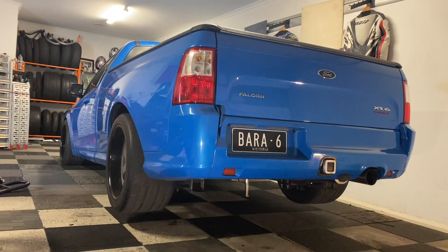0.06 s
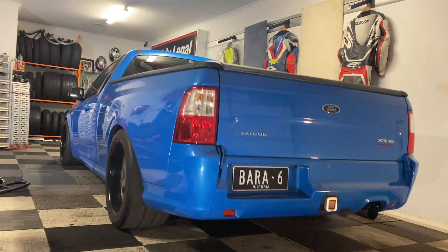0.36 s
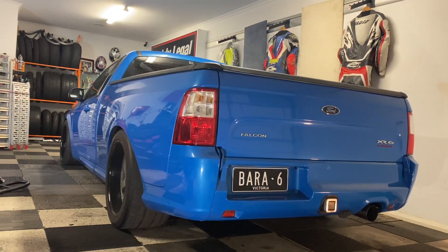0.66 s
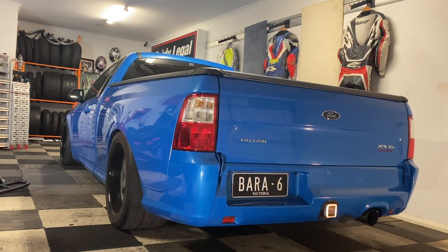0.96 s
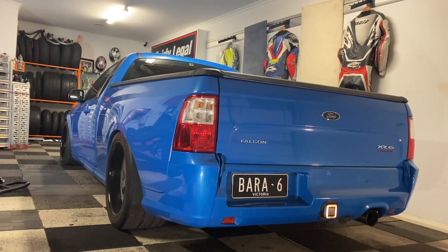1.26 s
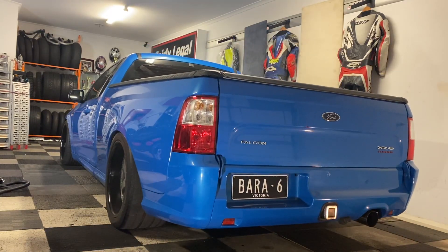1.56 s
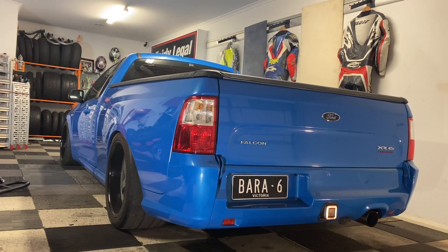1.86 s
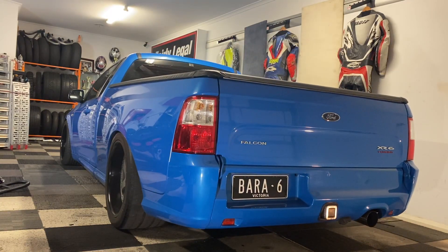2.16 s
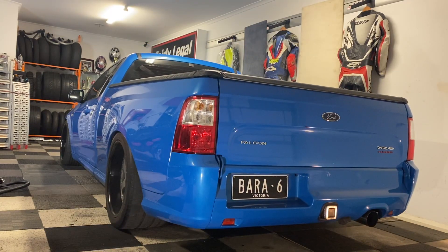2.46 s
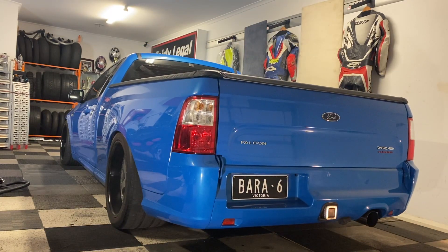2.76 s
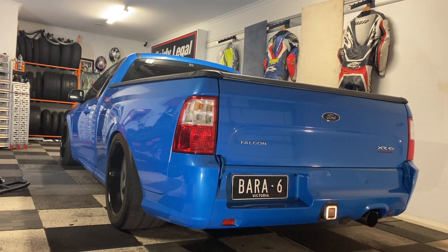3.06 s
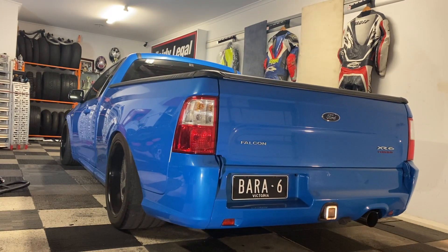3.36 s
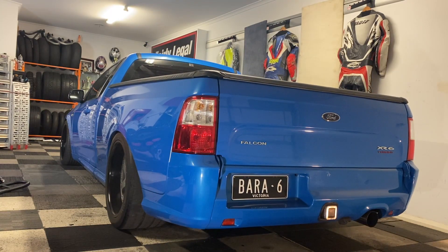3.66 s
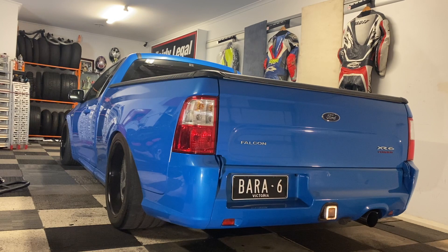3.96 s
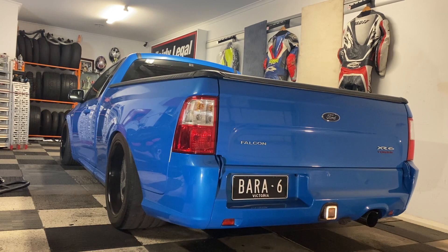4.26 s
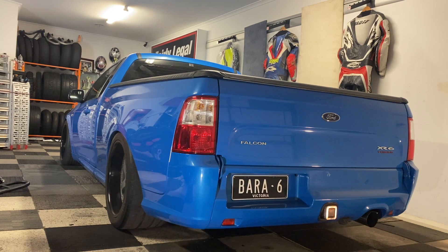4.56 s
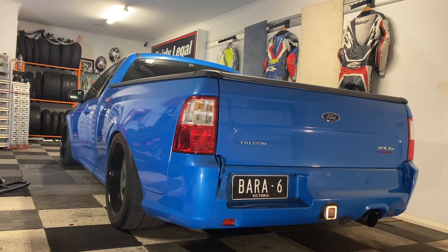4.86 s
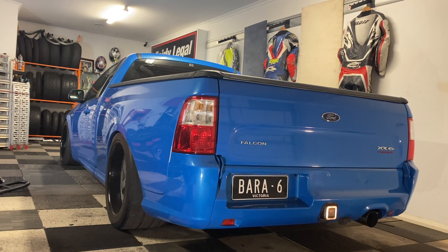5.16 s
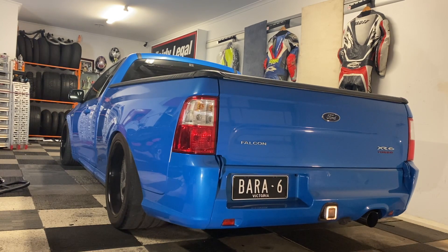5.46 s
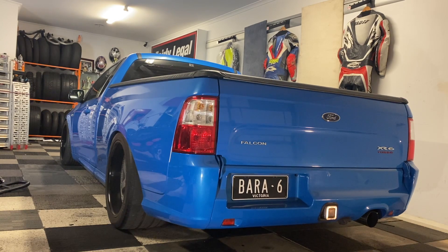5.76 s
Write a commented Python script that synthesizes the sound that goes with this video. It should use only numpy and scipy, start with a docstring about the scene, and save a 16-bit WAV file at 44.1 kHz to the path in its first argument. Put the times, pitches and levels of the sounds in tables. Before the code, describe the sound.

A loud rush of air and heavy thuds as a car comes off its air jacks, then a few separate clunks and a metallic snap.

```python
"""A hard-walled garage, behind the tailgate of a utility car coming down off its air jacks. A turbulent jet
roars from the valve, the tyres land in turn, panels boom and the body shudders. The last air sighs, seeps and
sings faintly, something clacks, and two jack rams knock home. Later come two heavy clunks, soft scuffs and the
snap of a metal coupling. Each blow is a burst of contact noise and each flow a sustained noise, filtered by the
resonances of its source and the reverberation of the room."""
import sys
import numpy as np
from scipy import signal
from scipy.fft import rfft, irfft, next_fast_len
from scipy.io import wavfile
from scipy.ndimage import uniform_filter1d

SR = 44100
rng = np.random.default_rng(int(sys.argv[2]) if len(sys.argv) > 2 else 0)


def put_to_file(sound):
    """Save the sound as 16-bit audio at rate SR, in the file named by the first command-line argument."""
    columns = np.atleast_2d(sound).T  # one column per channel
    safe = np.clip(columns, -1, 1)
    whole_steps = np.round(safe * 32767)
    wavfile.write(sys.argv[1], SR, whole_steps.astype(np.int16))


N = 256220
TIME = np.arange(N) / SR

# Transient excitations: (time [s], energy [dB], chatter time constant [s], tilt [dB/octave])
TYRE_BLOWS = [(.290, 6, 0.0012, 3), (.300, 9, 0.0028, 1.5), (.349, 9, 0.0054, 3), (.388, 7, 0.005, -6.5),
              (.476, 9.5, 0.0046, 0.2), (.499, 7.5, 0.0033, 0.5), (.612, -1, 0.0051, 0.5),
              (.682, -1.5, 0.0029, -5)]
SPIT_AND_CLACK = [(.338, -5.5, .005, 3), (1.458, -9.5, 0.0085, -0.3)]
RAM_BLOWS = [(1.936, 0.5, 0.005, 4.5), (1.943, 8.5, 0.0053, 3), (2.495, -8, 0.0028, 0),
             (2.505, -1, 0.0036, -4)]
PING_BLOWS = [(1.938, -18.5, 0.009, 0), (2.364, -24.5, 0.0076, -4)]
CLUNK_BLOWS = [(4.235, -10.5, 0.0064, 6.5), (4.249, 3.5, 0.0035, 1.74), (4.294, -3, 0.0075, -8),
               (4.466, -11, 0.0067, -15), (4.585, -23.5, 0.0041, -7)]
THUMP_BLOWS = [(4.805, -21.5, 0.0095, -1.5), (4.911, 0, 0.005, 2.5), (4.920, -2, 0.003, 2.5),
               (4.967, -4.5, 0.0016, -1.5), (5.170, -11.5, 0.0026, -0.2)]
SCUFF_RUBS = [(5.335, -22.5, 0.021, -8), (5.595, -25, 0.014, -7)]
CRACK_BLOWS = [(5.648, -7, 0.00015, -7)]
RATTLE_BLOWS = [(5.648, -4.5, 0.00084, 2), (5.653, -8.5, 0.0048, -5.5)]
# Spectral envelopes of the sources: (frequency [Hz], relative power density [dB])
AMBIENT_SPECTRUM = [(22, -27), (36, -13), (48, 0), (95, -1), (140, -9), (230, -17), (420, -24), (700, -36),
                    (1400, -43), (2100, -43), (2300, -34), (2480, -33.5), (2750, -45), (4500, -51),
                    (16000, -61)]
JET_SPECTRUM = [(30, -24), (55, -4), (110, 0), (350, -2), (700, -2.5), (1250, -9.5), (1550, -14),
                (2300, -14.5), (3300, -9.5), (5500, -14.5), (8000, -18.5), (11000, -23), (15500, -27)]
TYRE_SPECTRUM = [(25, -24), (38, -11), (50, 3), (80, 3), (140, -5.5), (240, -5.5), (550, -11.5), (750, -16),
                 (1250, -22), (2000, -34), (5000, -40), (16000, -72.5)]
SPIT_SPECTRUM = [(50, -7), (200, 4.5), (500, 4.5), (1000, -7), (1900, -5), (2400, -11), (3000, -4.5),
                 (3700, -16.5), (5000, -18), (8000, -7.5), (11000, -13), (16000, -17)]
LINE_SPECTRUM = [(35, -15), (60, 3.5), (95, 9.5), (150, 0.5), (280, 1), (450, -5), (650, -9.5), (900, -17),
                 (1300, -18), (2200, -23.5), (3200, -25), (5500, -37), (10000, -40.5), (16000, -58)]
RAM_SPECTRUM = [(35, -62.5), (70, -7.5), (100, 0), (190, 5), (320, 4.5), (430, 5), (750, -9), (1050, -22.5),
                (1900, -34.5), (3000, -59), (6000, -82), (16000, -81)]
PING_SPECTRUM = [(100, -15), (500, -6), (1900, -9), (2400, -9.5), (3000, -7.5), (3700, -12), (5000, -12),
                 (8000, -14.5), (11000, -17.5), (16000, -22)]
CLUNK_SPECTRUM = [(25, -14.5), (45, 5.5), (75, 6.5), (130, 1), (310, -2.5), (550, -7), (1000, -14.5),
                  (1600, -21), (2600, -34), (4500, -46), (7500, -46), (11000, -58.5), (16000, -68)]
THUMP_SPECTRUM = [(25, -9), (42, 9), (70, 13.5), (130, -4), (260, -3), (380, -5), (560, -10), (900, -18),
                  (1400, -26), (2500, -30), (3700, -41), (5500, -52.5), (16000, -73)]
COUPLING_SPECTRUM = [(40, -22), (100, -11), (250, -5), (550, 5), (1000, 1), (2300, -7), (3500, -14.5),
                     (5500, -19.5), (8000, -9.5), (11000, -11.5), (15000, -15.5)]
CRACK_SPECTRUM = [(100, -44), (1500, -11), (4000, -16), (5500, -2), (8000, -2), (11000, 9), (15000, -2)]
# Resonances whose power adds to an envelope: (frequency [Hz], bandwidth [Hz], relative strength [dB])
JET_PEAKS = [(130, 30, 3.4), (206, 14, 3), (315, 32, 7.5), (412, 15, 3.2), (1004, 12, 3.8), (1102, 20, 3),
             (1330, 35, 3), (1585, 26, 4), (3100, 40, -1), (4115, 40, 0)]
BODY_PEAKS = [(107.5, 6.6, 6), (153, 8.5, 8), (219.6, 23, 4.5), (271, 3.5, 4.5), (322, 3.4, 2.5),
              (393, 24, 4), (525, 33, -2), (565, 21, 6), (923, 12, -4.5)]
VALVE_PEAKS = [(1098, 68, 4.87), (1940, 60, 3.5), (2735, 31, 6.7), (4450, 190, 16), (5110, 230, 14.7),
               (6240, 49, 4.4)]
LINE_PEAKS = [(3200, 240, -4.5), (4600, 200, 2.5), (5013, 55, 10.5)]
RAM_PEAKS = [(100.4, 6.2, 6.6), (154, 42, 0.68), (243, 42, 2.8), (424.5, 5.8, 2), (502, 21, 2.4),
             (730, 78, 8.4), (929, 26, 6.8), (1250, 39, 7)]
PING_PEAKS = [(4430, 110, 9), (5050, 30, 18), (6100, 30, 10), (7360, 80, 5), (8355, 45, 8)]
CLUNK_PEAKS = [(205, 27, 4.1), (319, 89, 3.6), (574, 38, 4.5), (700, 15, 1.8), (940, 74, 7.3),
               (1410, 190, 3.2)]
THUMP_PEAKS = [(162, 19, 5.9), (195, 29, 4.4), (360, 29, 1.4), (484, 25, 9.6), (649, 43, 5.8),
               (738, 45, 2.5), (814, 22, 2.4), (1083, 90, 6.4), (1290, 83, 6.9), (2260, 35, 3.6)]
COUPLING_PEAKS = [(348, 9.7, 4.1), (504, 6.8, 2.6), (1553, 40, 3.4), (2060, 60, 6.7), (2370, 120, 3.6),
                  (2840, 52, 4), (4220, 38, 4.1), (5120, 320, 10), (6600, 230, 5.8)]
# Partials of the electrical hum: (frequency [Hz], level [dB])
HUM_PARTIALS = [(97, -66.5), (274.5, -87), (495.3, -82.5)]
# Blast and bleed of the valve: (start [s], end [s], level [dB], sag [dB/s])
VALVE_FLOWS = [(0, .5, -31, 4), (.55, 1.0, -46.5, 19)]
# Panels flexing under the heaviest blows: (time [s], frequency [Hz], peak [dB], time constant [s])
PANEL_BOOMS = [(0.297, 281.7, -25.5, 0.0078), (.478, 501, -25.5, 0.0078), (0.497, 60.4, -21, 0.01),
               (0.486, 95.5, -22.5, 0.0059), (4.912, 359, -25.5, 0.0053), (4.917, 79, -25, 0.0048),
               (4.963, 195, -29, 0.0031)]
# Air displaced by each ram: (start [s], end [s], level [dB], tilt [dB/octave])
LINE_SEEPS = [(1.32, 1.948, -54, 0.5), (1.708, 2.49, -53, -0.83)]
# Spells in which the seeping air sings: (start [s], end [s], level [dB])
WHISTLE_SPELLS = [(1.683, 1.75, -64.5), (2.117, 2.46, -69)]
# Reverberation of the garage: (frequency [Hz], time to fall 60 dB [s])
GARAGE_T60 = [(60, 0.17), (150, 0.71), (400, 0.65), (1000, 0.68), (3000, 0.6), (5500, 0.49), (9000, 0.57),
              (15000, 0.29)]
# Likeness of the two channels in the room's field: (frequency [Hz], correlation [-1 to 1])
CORRELATION = [(60, 1), (120, .95), (220, .7), (380, 0.44), (650, 0.08), (1300, 0.14), (2400, 0.62),
               (4400, 0.45), (8000, 0.2), (14000, -.3)]
# Leftward lean of the treble: (frequency [Hz], left minus right [dB])
LEFT_LEAN = [(400, 0), (900, 0), (2400, 3.5), (4400, 4), (8500, 0), (15000, 0.5)]
# Notches of the microphone ports: (frequency [Hz], half-width [Hz], depth [dB])
PORT_NOTCHES = [(9040, 508, 39), (13000, 520, 18.5)]


def amp(db):
    """Decibels to amplitude ratio."""
    return 10 ** (np.asarray(db) / 20)


def unit_rms(x):
    """Normalisation to unit mean power."""
    return x / np.sqrt(np.mean(x ** 2) + 1e-20)


def curve(points, hz):
    """Interpolation on a logarithmic frequency axis."""
    table_hz, value = np.transpose(points)
    return np.interp(np.log(hz + 1), np.log(table_hz), value)


def add(mix, start_s, sound):
    """Superposition of a sound on the mix."""
    part = mix[:, round(start_s * SR):][:, :sound.shape[1]]
    part += sound[:, :part.shape[1]]


def room_noise(size):
    """Partial coherence: noise at two ports is alike in the bass and less so above it."""
    common, separate = rfft(rng.standard_normal((2, size)))
    likeness = np.clip(curve(CORRELATION, np.fft.rfftfreq(size, 1 / SR)), -1, 1)
    right = likeness * common + np.sqrt(1 - likeness ** 2) * separate
    return irfft(np.array([common, right]), size)


def resonate(x, spectrum, peaks, tilt_db=0):
    """Minimum-phase filtering imposes an envelope and resonances but keeps the fine ripple of x."""
    size = 2 * next_fast_len(x.shape[1])
    bins, hz = rfft(x, size), np.fft.rfftfreq(size, 1 / SR)
    reach_hz = 35 + 0.088 * hz  # ripple narrower than this survives
    total = np.cumsum((abs(bins) ** 2).mean(0))
    smooth_power = (np.interp(hz + reach_hz, hz, total) - np.interp(hz - reach_hz, hz, total)) / reach_hz
    db = curve(spectrum, hz) + tilt_db * np.log2(np.clip(hz, 60, 4000))
    db -= 10 * np.log10(abs(smooth_power) + 1e-12)
    for centre_hz, width_hz, strength_db in peaks:
        db += 10 * np.log10(1 + amp(strength_db) ** 2 / (1 + (2 * (hz - centre_hz) / width_hz) ** 2))
    cepstrum = irfft(np.log(amp(db)))  # folded forward in time, so nothing rings before its cause
    cepstrum[1:size // 2] *= 2
    cepstrum[size // 2 + 1:] = 0
    sides = amp(np.outer([.5, -.5], curve(LEFT_LEAN, hz)))
    return irfft(bins * np.exp(rfft(cepstrum)) * sides)[:, :x.shape[1]]


def garage(direct_db, t60_scale=1, left_lag_s=0, build_s=0.0032):
    """Impulse response of the room: direct sound, then reflections decaying exponentially by band."""
    hz, t, bands = signal.stft(room_noise(SR), SR, nperseg=256)
    t60 = t60_scale * curve(GARAGE_T60, hz)[:, None]
    response = signal.istft(bands * amp(-60 * t / t60), SR)[1][:, :SR]
    response *= 1 - np.exp(-TIME[:SR] / build_s)
    response /= np.linalg.norm(response[0])
    response[[0, 1], [round(left_lag_s * SR), 0]] += amp(direct_db)
    return response


def swell(t, tau_s):
    """Transient envelope: a soft rise to 1 at twice tau_s, then exponential decay."""
    age = t / tau_s
    return (age / 2) ** 2 * np.exp(2 - age)


def bursts(rows, spectrum, peaks, direct_db, t60_scale=1, left_lag_s=0):
    """Transient excitation: each brief swell of noise rings its object and the room."""
    out, t = np.zeros((2, N)), TIME[:SR // 5]
    for start_s, db, chatter_s, tilt_db in rows:
        force = swell(t, chatter_s) * rng.standard_normal(len(t))
        echoed = signal.fftconvolve(force[None], garage(direct_db, t60_scale, left_lag_s), axes=1)
        sound = resonate(echoed, spectrum, peaks, tilt_db)
        add(out, start_s, amp(db) * unit_rms(sound) / np.sqrt(sound.shape[1]))
    return out


def held(start_s, end_s, db, sag_db_per_s=0, build_db_per_s=196, release_db_per_s=75):
    """Sustained envelope: exponential growth up to start_s, sag until end_s, then reverberant decay."""
    early, late = np.maximum(start_s - TIME, 0), np.maximum(TIME - end_s, 0)
    elapsed = np.clip(TIME, start_s, end_s) - start_s
    return amp(db - build_db_per_s * early - sag_db_per_s * elapsed - release_db_per_s * late)


def flow(spectrum, peaks, flutter_db, tilt_db, direct_db=0):
    """Turbulence radiates fluttering broadband noise; room reflections ripple its spectrum."""
    flutter = unit_rms(uniform_filter1d(rng.standard_normal(N + SR), size=700))
    jet = rng.standard_normal(N + SR) * amp(flutter_db * flutter)
    echoed = signal.fftconvolve(jet[None], garage(direct_db), axes=1)[:, SR:SR + N]
    return unit_rms(resonate(echoed, spectrum, peaks, tilt_db))


def hiss_band(hz, width_hz):
    """Heterodyning shifts low-passed noise to a centre frequency that may move."""
    lowpass = signal.butter(2, width_hz / 2, fs=SR, output="sos")
    baseband = signal.sosfilt(lowpass, room_noise(N) + 1j * room_noise(N))
    carrier = np.exp(2j * np.pi * np.cumsum(hz * np.ones(N)) / SR)
    return unit_rms((baseband * carrier).real)


def background(heave_db=2):
    """Noise floor of the building: amplitude-modulated rumble, faint hiss and electrical hum."""
    hum = sum(amp(db) * np.sqrt(2) * np.sin(2 * np.pi * (hz * TIME + rng.random()))
              for hz, db in HUM_PARTIALS)
    air = amp(-58.5) * unit_rms(resonate(room_noise(N), AMBIENT_SPECTRUM, []))
    rumble = signal.sosfiltfilt(signal.butter(2, 400, fs=SR, output="sos"), air)
    heave = unit_rms(uniform_filter1d(rng.standard_normal(N), size=6000))
    return air + rumble * (amp(heave_db * heave) - 1) + hum


def valve():
    """Jet noise: a blast while the jacks carry the car and a weaker bleed add in power."""
    gain = np.sqrt(sum(held(*row) ** 2 for row in VALVE_FLOWS))
    return gain * flow(JET_SPECTRUM, JET_PEAKS, flutter_db=1.04, tilt_db=0.42, direct_db=-1)


def tyres():
    """Impact excitation: the tyres land and bounce, ringing the modes of the body."""
    return bursts(TYRE_BLOWS, TYRE_SPECTRUM, BODY_PEAKS, direct_db=-2, t60_scale=0.77)


def panels():
    """Damped oscillation: each flexing panel radiates a few cycles straight to the microphone."""
    out, t = np.zeros((2, N)), TIME[:SR // 5]
    for start_s, hz, db, tau_s in PANEL_BOOMS:
        add(out, start_s, amp(db) * swell(t, tau_s) * np.sin(2 * np.pi * hz * t)[None])
    return out


def spit_and_clack():
    """A brief turbulent puff, and later a clack, excite the resonances of the valve."""
    return bursts(SPIT_AND_CLACK, SPIT_SPECTRUM, VALVE_PEAKS, direct_db=-1.5, t60_scale=0.74)


def shudder():
    """Free decay: the landed body rumbles on its springs and comes to rest."""
    rumble = unit_rms(resonate(room_noise(N), TYRE_SPECTRUM, BODY_PEAKS, tilt_db=-1))
    return held(start_s=0.59, end_s=TIME[-1], db=-41, sag_db_per_s=23.4) * rumble


def sigh(start_s=1.05, fall_octaves_per_s=0.4):
    """Band-limited flow noise: one hiss sinks in pitch with the pressure, above a steady lower one."""
    upper_hz = 5100 * 2 ** (-fall_octaves_per_s * np.clip(TIME - start_s, -1, 1))
    hiss = hiss_band(upper_hz, width_hz=1400) + amp(-4.5) * hiss_band(3150, width_hz=700)
    return held(start_s, end_s=1.42, db=-63.5, sag_db_per_s=23) * hiss


def air_lines():
    """Duct flow noise: each returning ram pushes air through the lines until it is home."""
    return sum(held(start_s, home_s, db) * flow(LINE_SPECTRUM, LINE_PEAKS, flutter_db=1, tilt_db=tilt_db)
               for start_s, home_s, db, tilt_db in LINE_SEEPS)


def whistle(centre_hz=1178, width_hz=55):
    """Narrow-band resonance: the seeping air sings at a constriction."""
    hz = np.fft.rfftfreq(N, 1 / SR)
    band = rfft(room_noise(N)) / (1 + (2 * (hz - centre_hz) / width_hz) ** 2)
    return sum(held(*row) for row in WHISTLE_SPELLS) * unit_rms(irfft(band, N))


def rams():
    """Modal ringing: two rams touch and seat with dull knocks, and their metal parts ping thinly."""
    knocks = bursts(RAM_BLOWS, RAM_SPECTRUM, RAM_PEAKS, direct_db=-3, t60_scale=0.75)
    pings = bursts(PING_BLOWS, PING_SPECTRUM, PING_PEAKS, direct_db=-3.5, t60_scale=0.73)
    return knocks + pings


def clunk():
    """A hard impact and its weaker, duller after-knocks excite broad, well-damped modes."""
    return bursts(CLUNK_BLOWS, CLUNK_SPECTRUM, CLUNK_PEAKS, direct_db=-5.5, t60_scale=0.8)


def thump():
    """Inelastic impact: a soft footfall comes first, then a deeper blow rebounds with less energy each time,
    and a separate knock follows."""
    return bursts(THUMP_BLOWS, THUMP_SPECTRUM, THUMP_PEAKS, direct_db=-5.5, t60_scale=0.79)


def scuffs():
    """Friction noise: the coupling rubs softly as it is handled."""
    return bursts(SCUFF_RUBS, COUPLING_SPECTRUM, [], direct_db=-0.5)


def coupling(left_lag_s=0.00023):
    """Sudden release gives a crack and a rattle; the arrival-time difference places them to the right."""
    crack = bursts(CRACK_BLOWS, CRACK_SPECTRUM, [], direct_db=13, left_lag_s=left_lag_s)
    rattle = bursts(RATTLE_BLOWS, COUPLING_SPECTRUM, COUPLING_PEAKS,
                    direct_db=-4, t60_scale=0.73, left_lag_s=left_lag_s)
    return crack + rattle


def scene():
    """Linear superposition of all the sources in the garage."""
    descent = background() + valve() + tyres() + panels() + spit_and_clack() + shudder()
    emptying = sigh() + air_lines() + whistle() + rams()
    return descent + emptying + clunk() + thump() + scuffs() + coupling()


def record(dry, cutoff_hz=15900):
    """Frequency response of the microphone: the notches of its ports, then a band limit."""
    hz = np.fft.rfftfreq(2 * N, 1 / SR)
    notch_db = sum(depth_db * np.exp(-((hz - centre_hz) / half_width_hz) ** 2)
                   for centre_hz, half_width_hz, depth_db in PORT_NOTCHES)
    heard = irfft(rfft(dry, 2 * N) * amp(-notch_db))[:, :N]
    lowpass = signal.firwin(301, cutoff_hz, window=("kaiser", 9), fs=SR)
    return signal.oaconvolve(heard, lowpass[None], "same", axes=1)


dry = scene()
out = record(dry)
put_to_file(out)
```